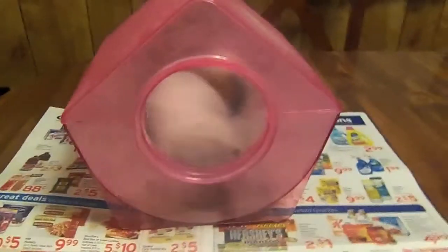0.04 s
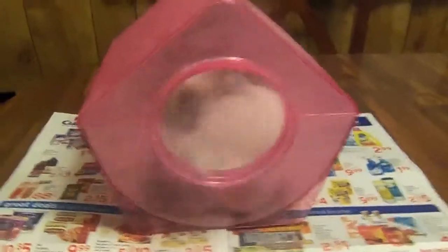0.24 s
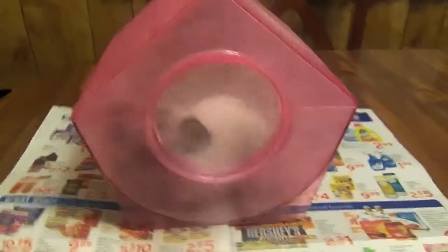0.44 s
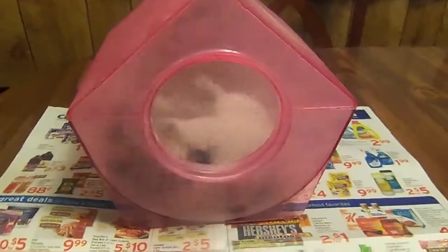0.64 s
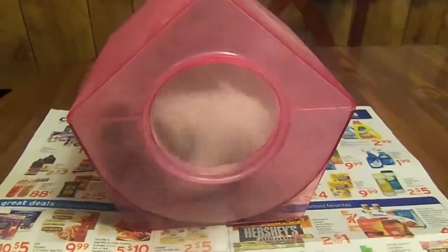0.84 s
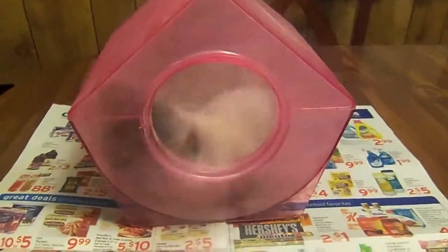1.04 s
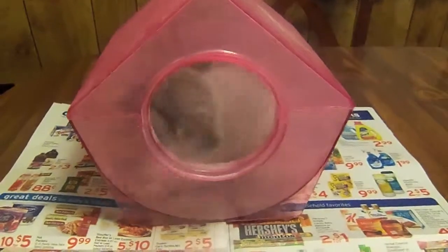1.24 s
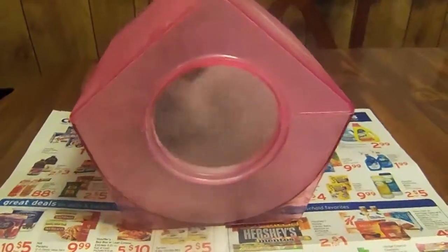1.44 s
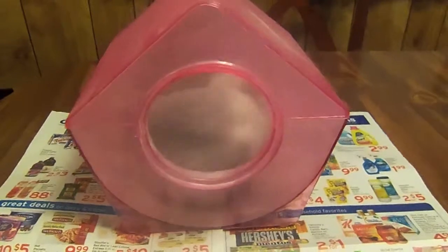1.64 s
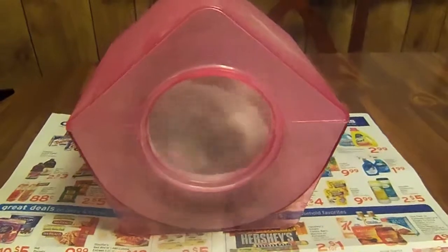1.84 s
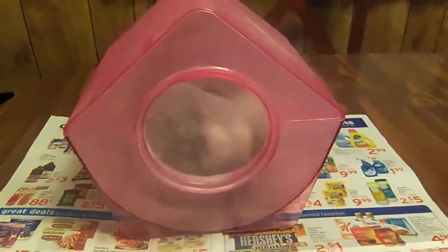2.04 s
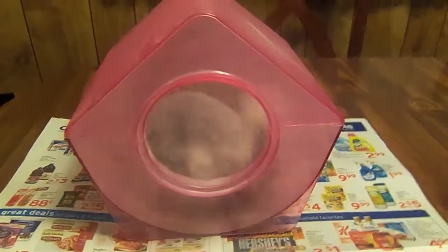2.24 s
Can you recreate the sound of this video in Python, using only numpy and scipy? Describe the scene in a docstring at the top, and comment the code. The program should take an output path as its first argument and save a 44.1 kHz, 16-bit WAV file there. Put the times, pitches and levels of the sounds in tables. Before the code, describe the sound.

A chinchilla rolls in a plastic dust bath on a wooden table, close up in a small, quiet, boomy room. From 0.2 to 0.45 s, rapid deep thumps with hollow plastic knocks, claw scratches and sharp dust sprays, loudest near 0.4. Single thuds at 0.58 and 0.9, a clack at 0.94, a double knock around 1.37, thuds at 1.54 and 1.65, then weaker bumps and soft dusty rubbing until about 2.3.

```python
"""In a small room, a chinchilla rolls and kicks in a plastic dust bath on a wooden table.
Its body thumps the table through the tub: each blow excites damped resonances, echoes and room modes.
The shell clacks and sounds a hollow note, and claws scratch it: noise bursts and short decaying tones.
Fine dust swishes and sprays against the walls as coloured grains, over quiet room air."""
import sys
import numpy as np
from scipy import signal
from scipy.fft import rfft, irfft
from scipy.io import wavfile

SR = 44100
rng = np.random.default_rng(int(sys.argv[2]) if len(sys.argv) > 2 else 0)


def wrap_up_sound(samples):
    """Save the sound to the file named by the first command line argument, as 16-bit audio."""
    columns = np.atleast_2d(samples).T
    # keep every value between -1 and 1, then stretch to whole-number steps
    tamed = np.clip(columns, -1, 1)
    steps = np.round(tamed * 32767).astype(np.int16)
    wavfile.write(sys.argv[1], SR, steps)


N = 101430
TIME = np.arange(N) / SR  # [s]


def from_db(db):
    """Decibels to gain."""
    return 10 ** (np.asarray(db) / 20)


def rms_one(x):
    """Scale to unit rms."""
    return x / np.sqrt(np.mean(x ** 2) + 1e-20)


def noise():
    """White noise, as long as the scene."""
    return rng.standard_normal(N)


def delay(x, s):
    """The same sound, s seconds later."""
    return np.interp(TIME - s, TIME, x, left=0)


def resonate(x, hz, width_hz):
    """One two-pole resonance with gain 1 on top."""
    r = np.exp(-np.pi * width_hz / SR)
    zeros = np.array([1, 0, -1]) * (1 - r * r) / 2
    poles = [1, -2 * r * np.cos(2 * np.pi * hz / SR), r * r]
    return signal.lfilter(zeros, poles, x + 1e-18)  # the tiny offset avoids denormals


def colour(x, spectrum):
    """Give steady noise a spectrum, rolled off below its first point; rms 1."""
    hz, db = np.transpose(spectrum)
    bins = np.maximum(np.fft.rfftfreq(N, 1 / SR), 1)
    gain = from_db(np.interp(np.log(bins), np.log(hz), db))
    low_cut = np.minimum(bins / hz[0], 1) ** 2
    return rms_one(irfft(rfft(x) * gain * low_cut, N))


def bursts(rows):
    """Envelope of contacts (time [s], level [dB], decay [s]): quick rise, exponential fall."""
    attack_s = 0.00057
    out = 0
    for s, db, decay in rows:
        age = np.maximum(TIME - s, 0)
        out = out + from_db(db) * (1 - np.exp(-age / attack_s)) * np.exp(-age / decay)
    return out


def flutter():
    """Quick uneven gain of a sliding contact: slow noise swings the level in dB."""
    depth_db, cutoff_hz = 1.5, 43.3  # depth is rms
    slow = signal.sosfilt(signal.butter(2, cutoff_hz, fs=SR, output="sos"), noise())
    return from_db(depth_db * rms_one(slow))


def grains():
    """Single grains of uneven size over the smooth hiss of fine powder."""
    grains_per_s, spread_db, grain_share = 2500, 5, 0.25  # share of the power
    sizes = from_db(spread_db * np.minimum(rng.exponential(1, N), 5)) * rng.choice([-1, 1], N)
    clicks = rms_one(sizes * (rng.random(N) < grains_per_s / SR))
    return np.sqrt(grain_share) * clicks + np.sqrt(1 - grain_share) * noise()


def room(x, wet_db):
    """Add the diffuse tail of the room: exponentially fading noise after a short gap."""
    t60_s, gap_s = 0.28, 0.009
    tail = delay(noise() * from_db(-60 * TIME / t60_s), gap_s)
    return x + from_db(wet_db) * signal.fftconvolve(x, tail / np.linalg.norm(tail))[:N]


# Spectrum of the quiet room air: (frequency [Hz], relative level [dB per Hz])
AIR_SPECTRUM = [(20, -10), (38, 3), (47, 6.5), (58, -16), (80, 3), (140, 3), (300, -15), (700, -21),
                (2000, -43), (14000, -32)]


def quiet_air():
    """Steady, mostly low noise of the room's air."""
    level_db = -49.5
    return from_db(level_db) * colour(noise(), AIR_SPECTRUM)


DUST_WET_DB = -17
# Churning, before the trims: (time [s], dust hiss level [dB], fur-on-plastic rub level [dB])
CHURN_LEVELS = [(0.0, -52.5, -50.5), (0.05, -51, -52), (0.09, -45.5, -54.5), (0.17, -51.0, -49.5),
                (0.24, -52, -59), (0.277, -42.0, -54), (0.351, -54, -60), (0.391, -43.5, -45),
                (0.45, -45.5, -58), (0.518, -54.0, -60.0), (0.591, -55.5, -63), (0.66, -61.5, -65.5),
                (0.73, -62, -63.5), (0.79, -56.0, -59.5), (0.849, -63, -58), (0.9, -58, -58),
                (0.999, -57, -62), (1.08, -61, -58.5), (1.18, -61.5, -61), (1.238, -53, -58),
                (1.291, -53.5, -50.5), (1.34, -67, -68), (1.38, -58.5, -54), (1.5, -58.0, -58.5),
                (1.56, -56.5, -54.5), (1.63, -59.5, -60), (1.678, -56.5, -55.5), (1.747, -55.5, -52),
                (1.785, -65.5, -66.5), (1.87, -67.5, -63), (1.959, -60.5, -55.5), (2.03, -57.5, -56),
                (2.075, -65.5, -61), (2.129, -56, -51.5), (2.2, -58.0, -53), (2.3, -65.5, -62.5)]
# Spectrum of dust, churned or sprayed: (frequency [Hz], relative level [dB per Hz])
DUST_SPECTRUM = [(600, -25), (2000, -17.5), (3500, -4.5), (5500, 0), (9000, -2.5), (13500, -2)]
# Spectrum of fur rubbing on plastic: (frequency [Hz], relative level [dB per Hz])
RUB_SPECTRUM = [(300, -10), (900, 1.5), (1400, 1.5), (2200, 0), (2900, 3), (3800, -4), (7000, -36),
                (14000, -26)]


def churning():
    """Dust hisses under the fur and fur rubs the plastic, both with one uneven sliding contact."""
    hiss_trim_db, rub_trim_db = 3.5, 0.5
    s, *levels = np.transpose(CHURN_LEVELS)
    hiss_db, rub_db = [np.interp(TIME, s, level) for level in levels]
    hiss = from_db(hiss_db + hiss_trim_db) * colour(grains(), DUST_SPECTRUM)
    rub = from_db(rub_db + rub_trim_db) * colour(grains(), RUB_SPECTRUM)
    return room((hiss + rub) * flutter(), DUST_WET_DB)


def standing_wave(x, hz, db, t60):
    """One mode of the room, a narrow resonance building up shortly after the blow."""
    mode_delay_s = 0.00346
    width_hz = np.log(1000) / np.pi / t60
    return from_db(db) * delay(resonate(x, hz, width_hz), mode_delay_s)


# Early reflections off the near walls: (delay [s], level [dB])
WALL_ECHOES = [(0.0142, -6), (0.0205, -27), (.0341, -42)]
# Standing waves of the room, apart from the separately driven one: (frequency [Hz], level [dB], t60 [s])
ROOM_WAVES = [(89.8, 15.5, 0.9), (121.7, 19, 0.58), (206.5, 14.5, 0.64), (219.8, 6.5, 0.99),
              (269.2, 7, 0.57), (296.3, 1, 0.48), (354.2, -1, 0.67), (449, 5.5, 0.27)]
# The separately driven deep standing wave: (frequency [Hz], level [dB], t60 [s])
DEEP_WAVE = (141.5, 30.92, 0.52)


def boom(x, deep):
    """Low sound bounces off near walls and rings standing waves; deep drives one strong low wave."""
    wet_db = -9.5
    echoes = sum(from_db(db) * delay(x, s) for s, db in WALL_ECHOES)
    waves = sum(standing_wave(x, *mode) for mode in ROOM_WAVES)
    return room(x, wet_db) + echoes + waves + standing_wave(deep, *DEEP_WAVE)


# Resonances of table and tub, in series: (frequency [Hz], width [Hz])
TABLE_RESONANCES = [(354.6, 70.7), (166.7, 123.4)]


def thud():
    """One soft, furry blow: a damped low-pass pulse through the table's resonances; peak 1."""
    soft_hz, soft_damping = 312.5, 0.83  # damping is 1/Q
    w = 2 * np.pi * soft_hz
    soft_filter = signal.bilinear([w * w], [1, soft_damping * w, w * w], SR)
    x = signal.lfilter(*soft_filter, signal.unit_impulse(N) + 1e-18)
    for hz, width_hz in TABLE_RESONANCES:
        x = resonate(x, hz, width_hz)
    return x / np.abs(x).max()


# Weight of the rolling body on the tub: (time [s], level [dB])
ROLLING_WEIGHT = [(0, -36.5), (.13, -44), (.19, -36), (.37, -31), (.45, -26.5), (.55, -40), (.70, -46.5),
                  (.77, -47), (.89, -61.5), (.95, -21.5), (1.07, -46), (1.29, -31.5), (1.34, -44),
                  (1.40, -32), (1.50, -31), (1.64, -36.5), (1.80, -43.5), (2.03, -33), (2.10, -53),
                  (2.20, -49), (2.26, -60), (2.3, -69)]
# Spectrum of the tub grinding on the table: (frequency [Hz], relative level [dB per Hz])
GRIND_SPECTRUM = [(300, -11), (480, 8.5), (780, 4.5), (1100, -9), (1600, -14), (3000, -21), (14000, -36)]


def rolling():
    """Random soft bumps boom as a low rumble while the tub grinds on the table under the weight."""
    bumps_per_s, low_hz, top_hz = 500, 111, 338
    rumble_db, grind_db, deep_db = -0.5, -18, -5  # relative to the weight; deep: drive of the deep wave
    bumps = noise() * (rng.random(N) < bumps_per_s / SR)
    soft = signal.butter(3, [low_hz, top_hz], "band", fs=SR, output="sos")
    soft_bumps = signal.sosfilt(soft, signal.fftconvolve(bumps, thud())[:N])
    rumble = from_db(rumble_db) * rms_one(boom(soft_bumps, from_db(deep_db) * soft_bumps))
    grind = from_db(grind_db) * colour(grains(), GRIND_SPECTRUM) * flutter()
    weight = from_db(np.interp(TIME, *np.transpose(ROLLING_WEIGHT)))
    return weight * (rumble + grind)


# Body hits on the tub floor, also heard as shell knocks and hollow notes:
# (time [s], dry thud peak [dB], shell knock level [dB], deep wave drive relative to the thud [dB])
BODY_HITS = [(0.0409, -29, -66, 1.5), (.149, -36, -48, 11.5), (0.2019, -11.5, -27.5, -6),
             (0.2539, -15, -28, -7), (0.319, -19.5, -41, -5.5), (0.356, -22.5, -44, -4),
             (0.3916, -7, -27.5, -1.5), (0.4093, -14, -29.5, 0), (0.4236, -16.5, -34.5, 4),
             (.5775, -20, -37, 0.5), (0.6809, -27.5, -69, 0.5), (0.912, -16, -35.5, -2.5),
             (1.05, -37, -52.5, 9.5), (1.0876, -24.5, -56, -3.5), (1.123, -35.5, -42.5, 6.5),
             (1.1898, -18.5, -45, 1.5), (1.246, -21, -38, -34), (1.3559, -15.5, -28.5, -3.5),
             (1.3913, -13.5, -32.5, -8.5), (1.5374, -15, -30, 0.5), (1.651, -17, -32.5, 4),
             (1.8276, -25, -38, 3.5), (1.9216, -27, -41.5, 4.5), (1.973, -31, -40.5, 10),
             (2.007, -25.5, -42, 2.5), (2.129, -41, -58, 9.5)]


def thumps():
    """The body hits the tub floor and the room booms after each blow."""
    blow = thud()
    direct = sum(from_db(db) * delay(blow, s) for s, db, _, _ in BODY_HITS)
    deep = sum(from_db(db + drive_db) * delay(blow, s) for s, db, _, drive_db in BODY_HITS)
    return boom(direct, deep)


# Spectrum of the shell's knock: (frequency [Hz], relative level [dB per Hz])
KNOCK_SPECTRUM = [(200, 8), (450, -2.5), (600, 2.5), (720, -13), (900, 0), (1100, -7.5), (1400, -9.5),
                  (2200, -18.5), (4000, -21), (14000, -32)]


def shell_knocks():
    """The heavily damped plastic knocks with each thump: short bursts of coloured noise."""
    decay_s, wet_db = 0.0055, -0.5
    envelope = bursts([(s, db, decay_s) for s, _, db, _ in BODY_HITS])
    return room(envelope * colour(noise(), KNOCK_SPECTRUM), wet_db)


# The tub's hollow note: (frequency [Hz], level relative to the knock, before the rise [dB], t60 [s])
HOLLOW_MODES = [(583.3, 7.5, 0.076), (613, -10, 0.11), (472.4, -8.5, 0.32)]


def hollow_notes():
    """The tub's hollow note answers each knock a moment later: softly rising, decaying sines."""
    delay_s, rise_s = 0.0092, 0.0046
    age = np.maximum(TIME - delay_s, 0)
    modes = sum(from_db(db - 60 * age / t60) * np.sin(2 * np.pi * hz * age)
                for hz, db, t60 in HOLLOW_MODES)
    note = modes * (1 - np.exp(-age / rise_s))
    return sum(from_db(db) * delay(note, s) for s, _, db, _ in BODY_HITS)


# Claws on the plastic: (time [s], level before the trims [dB], decay time constant [s], main pitch [Hz])
CLAW_SCRATCHES = [(.205, -30, 0.0038, 3050), (0.393, -27, 0.0032, 6000), (0.579, -38, 0.002, 2900),
                  (0.9117, -35.5, 0.0028, 2580), (1.1335, -38, 0.0044, 4650), (1.1458, -40, 0.0019, 5000),
                  (1.259, -34.5, 0.005, 2770), (1.358, -33, 0.0029, 2900), (1.368, -40, 0.0034, 3800),
                  (1.387, -40, 0.0036, 2800), (1.453, -39, 0.0048, 2900), (1.537, -42, 0.0037, 3280),
                  (1.6056, -43, 0.0041, 3100), (1.8285, -40.5, 0.0035, 3040), (1.9209, -43, .003, 2800),
                  (2.1397, -39.5, 0.0042, 2970), (2.273, -44.5, 0.0077, 3420)]
# Spectrum of the claw's rasp: (frequency [Hz], relative level [dB per Hz])
CLAW_SPECTRUM = [(500, -22), (1400, 5), (2100, -1), (2900, 5), (3800, -13.5), (5000, -5), (7000, -11),
                 (14000, -11)]


def claws():
    """Each scratch rasps and rings the plastic briefly: grains through a wide resonance."""
    ring_width_hz, ring_db, rasp_db, wet_db = 920, -2.5, -1.5, -13
    slips = grains()
    rasp = from_db(rasp_db) * colour(grains(), CLAW_SPECTRUM)
    scratches = 0
    for s, db, decay, hz in CLAW_SCRATCHES:
        ring = from_db(ring_db) * rms_one(resonate(slips, hz, ring_width_hz))
        scratches = scratches + bursts([(s, db, decay)]) * (rasp + ring)
    return room(scratches, wet_db)


# Kicked dust hitting the wall: (time [s], level [dB], decay time constant [s])
DUST_SPRAYS = [(.205, -30, 0.003), (.3935, -25.5, 0.0028), (.4145, -22.5, 0.0013), (.4364, -23, 0.0027),
               (.502, -35, 0.0025), (.523, -34, 0.0016), (.622, -35.5, 0.0019), (1.259, -48.5, 0.016),
               (1.3585, -34.5, 0.0019), (1.3685, -26, 0.0014)]


def sprays():
    """Dust sprays off the kicking feet: short bursts of dust-coloured grains."""
    return room(bursts(DUST_SPRAYS) * colour(grains(), DUST_SPECTRUM), DUST_WET_DB)


# The shell clacking on the table: (time [s], level [dB])
SHELL_CLACKS = [(0.3193, -37.5), (0.353, -37.5), (0.4961, -32.5), (0.676, -43), (0.941, -28), (1.085, -42),
                (1.188, -37), (1.4762, -38.5), (1.503, -55)]
# Spectrum of the clack: (frequency [Hz], relative level [dB per Hz])
CLACK_SPECTRUM = [(250, -5), (700, -4.5), (1000, 2.5), (1300, -7.5), (1800, -7), (2400, -12), (3500, -20.5),
                  (5500, -58), (14000, -32)]


def shell_clacks():
    """The damped shell clacks on the table: short bursts of coloured noise."""
    decay_s, wet_db = 0.0065, -11
    envelope = bursts([(s, db, decay_s) for s, db in SHELL_CLACKS])
    return room(envelope * colour(noise(), CLACK_SPECTRUM), wet_db)


# Lone pieces of grit against the wall: (time [s], level [dB])
GRIT_TICKS = [(.3711, -40), (.5611, -37), (0.701, -42.5), (1.5205, -37)]


def grit():
    """Coarser grit ticks against the wall: short bursts of high, narrow noise."""
    decay_s, hz, width_hz = 0.0027, 12650, 1200
    envelope = bursts([(s, db, decay_s) for s, db in GRIT_TICKS])
    return room(envelope * rms_one(resonate(noise(), hz, width_hz)), DUST_WET_DB)


def scene():
    """The dust bath over the quiet air of the room."""
    body = rolling() + thumps()
    shell = shell_knocks() + hollow_notes() + claws() + shell_clacks()
    dust = churning() + sprays() + grit()
    return (quiet_air() + body + shell + dust)[None]


def record(dry):
    """The loudest peaks are flattened by a soft limit, then a steep low-pass cuts the top."""
    ceiling, cutoff_hz = 0.35, 14100
    flattened = dry / (1 + (dry / ceiling) ** 8) ** (1 / 8)
    top_cut = signal.ellip(10, 0.2, 70, cutoff_hz, fs=SR, output="sos")
    return signal.sosfilt(top_cut, flattened)


dry = scene()
out = record(dry)
wrap_up_sound(out)
```